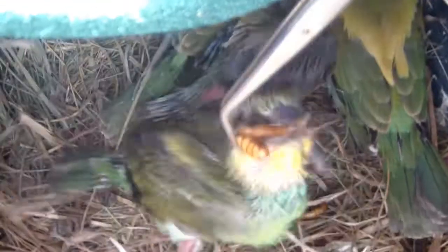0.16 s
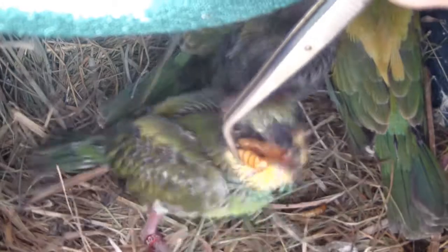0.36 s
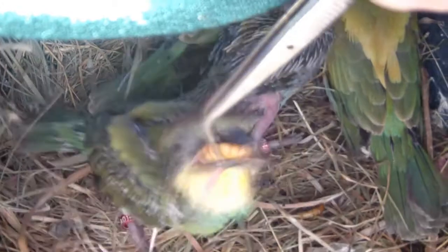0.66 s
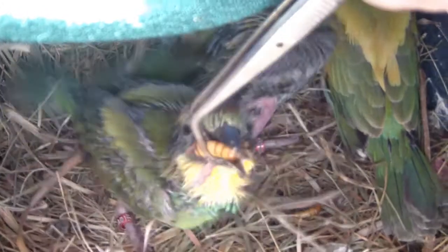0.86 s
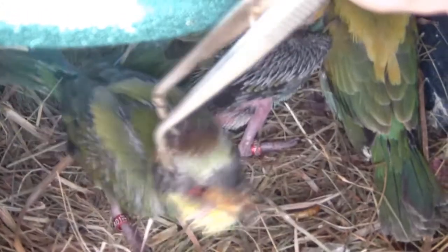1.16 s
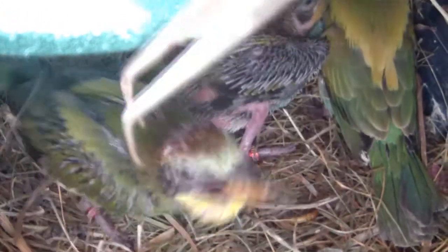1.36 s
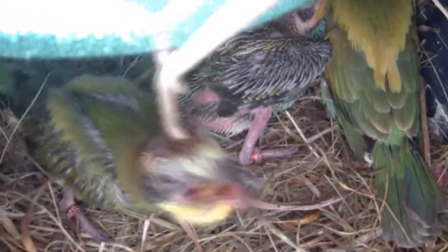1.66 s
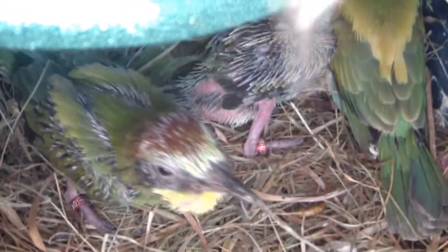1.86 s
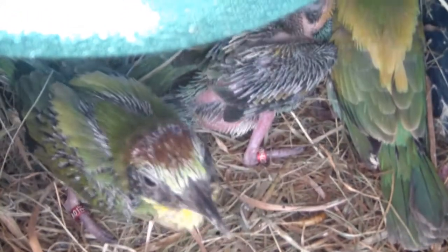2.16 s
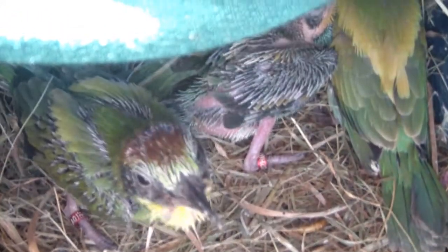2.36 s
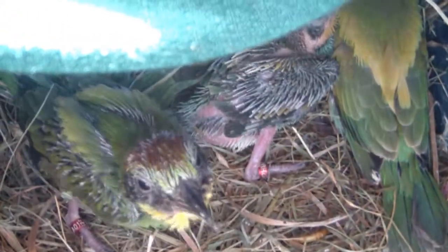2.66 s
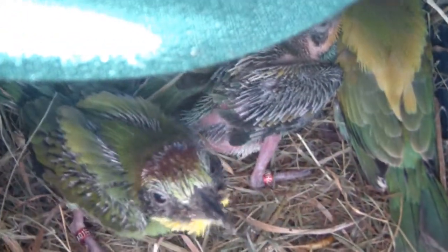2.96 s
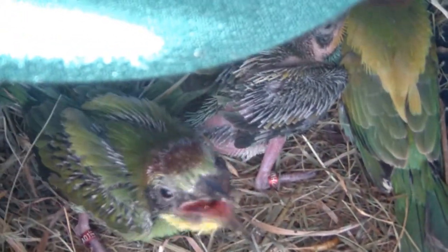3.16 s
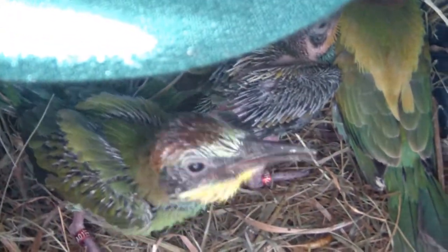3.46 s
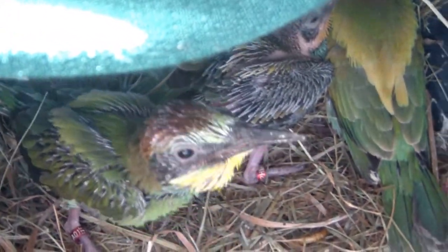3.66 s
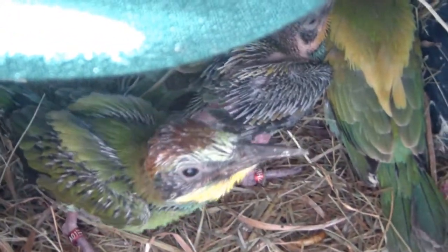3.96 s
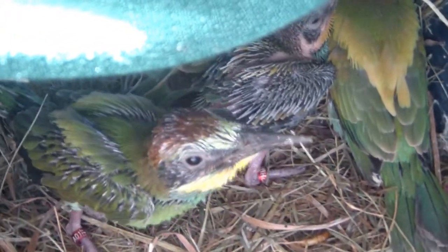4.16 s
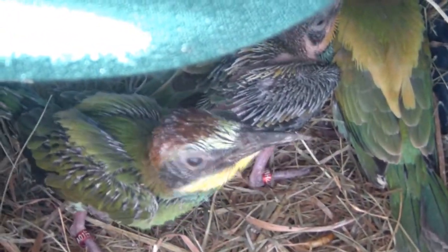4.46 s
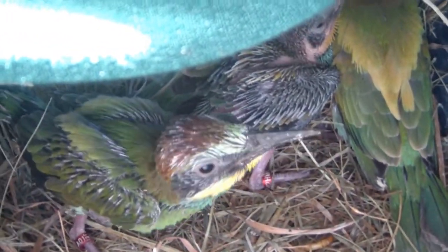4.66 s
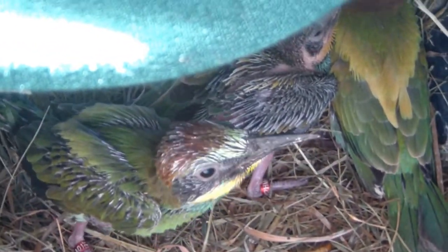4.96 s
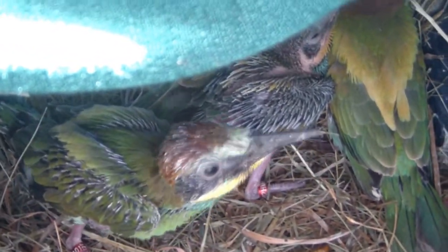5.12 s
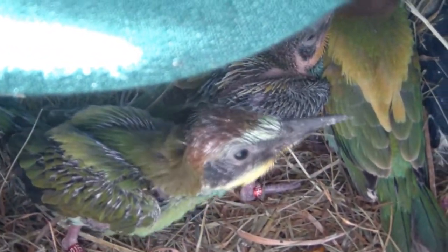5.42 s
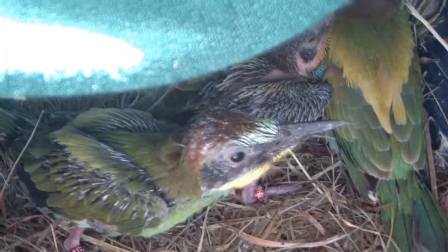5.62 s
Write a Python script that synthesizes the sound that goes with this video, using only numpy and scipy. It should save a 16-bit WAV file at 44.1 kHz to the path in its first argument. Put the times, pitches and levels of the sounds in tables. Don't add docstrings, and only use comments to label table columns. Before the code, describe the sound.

A nestling right at the microphone begs in fast warbling trills amid grass crackle and clacks, then falls quiet while distant young birds peep.

```python
import sys
import numpy as np
from scipy import signal
from scipy.fft import rfft, irfft
from scipy.io import wavfile
from scipy.ndimage import uniform_filter1d

SR = 44100
rng = np.random.default_rng(int(sys.argv[2]) if len(sys.argv) > 2 else 0)


def boost(x):
    u = np.asarray(x, float) / 20
    return 10 ** u


def materialize(psi):
    bounded = np.clip(np.atleast_2d(psi).T, -1, 1)
    quanta = np.round(bounded * 32767).astype(np.int16)
    wavfile.write(sys.argv[1], SR, quanta)


N = 255339
T = np.arange(N) / SR
HZ = np.fft.rfftfreq(N, 1 / SR)

ENTRY_HZ, CHUR_SETTLE_S = 212, 0.0074
LAST_FADE_DB = 15.5


def band(x, lo_hz, hi_hz, order=2):
    return signal.sosfilt(signal.butter(order, [lo_hz, min(hi_hz, .45 * SR)], "band", fs=SR, output="sos"), x)


def unit(x):
    return x / np.sqrt(np.mean(x ** 2))


def noise_band(lo_hz, hi_hz):
    return unit(band(rng.standard_normal(N), lo_hz, hi_hz))


def flutter(hz):
    return unit(signal.sosfilt(signal.butter(2, hz, fs=SR, output="sos"), rng.standard_normal(N)))


def slew(x):
    return uniform_filter1d(x, size=66)


def bumps(times_s, width_s):
    marks = np.zeros(N)
    marks[(times_s * SR).astype(int)] = 1
    bell = np.exp(-(np.arange(-400, 401) / SR / width_s) ** 2)
    return signal.fftconvolve(marks, bell, "same")


def nestling():
    # (time [s], length [s])
    rasps = [(.005, 0.017), (0.111, 0.038), (0.199, 0.055), (0.3, 0.053), (0.546, 0.014), (0.641, 0.014),
             (1.089, 0.024), (2.021, 0.034), (2.131, 0.025), (2.245, 0.03), (2.347, 0.045), (2.531, 0.036),
             (2.619, 0.078), (3.339, 0.12), (3.601, 0.038), (3.697, 0.023), (3.885, 0.092), (4.019, .035),
             (0.431, 0.048), (1.319, 0.0079), (1.43, 0.011), (1.665, 0.011), (1.859, 0.038), (3.644, 0.019)]
    swell_s, runup_s = 0.004, 0.0025
    kick, kick_s, kick_hz = 0.31, 0.0035, 350
    loudest_db = -6

    rows = notes()
    start_s, chur = rows[:, 0], rows[:, 7] == CHUR_SETTLE_S
    k = np.clip(np.searchsorted(start_s, T, "right") - 1, 0, None)
    began_s, from_hz, to_hz, from_db, to_db, octave_db, sharp_hz, settle_s, soft_db, closes = rows[k].T
    since = T - began_s
    along = since / np.diff(start_s, append=N / SR)[k]
    along = along ** (1 + 1.5 * closes)

    jumps = (rows[1:, 1] != rows[:-1, 2]) & (rows[1:, 3] > -80) & (rows[:-1, 3] > -80)
    jump_s = start_s[1:][jumps]
    flick_s = start_s[1:][jumps & ~chur[1:]]
    catch_s = start_s[1:][jumps & ((rows[1:, 6] > 0) | ~chur[1:])]

    after = np.minimum(k + 1, len(rows) - 1)
    runup_hz = chur[after] * rows[after, 6] * np.exp(-np.abs(start_s[after] - T) / runup_s)
    glide = np.where((to_hz < from_hz) & (closes == 0), 1 - (1 - along) ** 1.7, along)
    hz = slew(from_hz + glide * (to_hz - from_hz) + sharp_hz * np.exp(-since / settle_s) + runup_hz)
    hz = hz + 350 * bumps(flick_s, 0.0013)
    phase = 2 * np.pi * np.cumsum(hz * (1 + .006 * flutter(250))) / SR

    tone_db = from_db + along * (to_db - from_db) - soft_db * np.exp(-since / swell_s)
    tone = slew(boost(np.minimum(tone_db, loudest_db)))
    tone = tone * np.clip(1 - 0.68 * bumps(catch_s + 0.0016, 0.0008), 0, 1)
    throbs = np.exp(-since / kick_s) * (1 - np.cos(2 * np.pi * kick_hz * since))
    tone = tone * (1 + kick * (sharp_hz == ENTRY_HZ) * throbs)
    octave = slew(boost(octave_db - closes * along * LAST_FADE_DB + 2.5 * flutter(45)))
    octave = octave * np.clip(1 - bumps(catch_s, .003), 0, 1)

    beat = 2 * np.pi * np.cumsum(380 * (1 + 0.147 * flutter(129.0))) / SR
    rasp = slew(1. * sum((T > s) & (T < s + length_s) for s, length_s in rasps))
    shiver = boost(rasp * 3 * np.tanh(flutter(170)))
    blur = rasp * .6 * flutter(500)
    pure = np.sin(phase + 0.28 * blur) + rasp * 0.19 * np.sin(phase + beat)
    voice = shiver * (tone * boost(0.47 * flutter(81)) * pure + octave * np.sin(2 * phase + blur))
    voice += upper_partials(tone, hz, phase, jump_s)
    return np.sqrt(2) * voice + breath(tone, octave)


def upper_partials(tone, hz, phase, jump_s):
    # (time [s], high partials level [dB], third partial level [dB])
    gape = [(0, -26, -25), (.18, -27, -21.5), (.3, -34, -56), (.6, -35, -64), (0.751, -29, -72),
            (1.0, -33.5, -80), (1.199, -31, -43), (1.449, -28.5, -68), (1.7, -25, -42), (1.839, -29, -40),
            (1.864, -15, -22), (1.903, -52, -54), (2.601, -36, -49), (3.399, -44, -40), (3.55, -24.5, -19),
            (3.64, -31, -18.5), (3.85, -34.5, -31.5), (4.001, -13, -28)]
    partials = [-7, -3, -4, -5, -7]
    s, high_db, third_db = np.transpose(gape)
    third = np.sqrt(tone) * boost(np.interp(T, s, third_db) + 5.4 * flutter(23.0)) * np.sin(3 * phase)
    out = third * np.clip(1 - bumps(jump_s, 0.001), 0, 1)
    strain = slew(tone ** .7 * (tone > boost(-70))) * boost(4)
    high = strain * boost(np.interp(T, s, high_db))
    smear = .06 * flutter(300)
    beak_hz = np.interp(T, [3.87, 3.92], [11300, 8500])
    for order, db in enumerate(partials, start=4):
        level = boost(db - 5 + 7.1 * np.tanh(1.15 * flutter(81)))
        resonance = np.exp(-((order * hz - beak_hz) / 3300) ** 2)
        out += high * level * np.sin(order * (phase + smear)) * resonance
    return out


def breath(tone, octave):
    # (time [s], level [dB])
    puff = [(0, -31), (.3, -35), (.6, -40), (1.0, -40.5), (1.5, -36), (1.86, -35), (2.0, -40), (2.6, -34),
            (3.4, -32), (3.6, -27), (3.85, -35), (4.0, -35)]
    hoarse = (tone * boost(-25.0) + octave * boost(-18.0)) * noise_band(1330, 4420)
    flow = uniform_filter1d(tone ** .45 * (tone > boost(-70)), size=300)
    hiss = flow * boost(np.interp(T, *np.transpose(puff)) + 3 * flutter(60)) * noise_band(8500, 15500)
    return hoarse + hiss


def notes():
    # (time [s], pitch [Hz], level [dB], start above pitch [Hz])
    churs = [(2.018, 1570, -9, -3), (2.065, 1561, -11, 462.5), (2.096, 1766, -7, -7),
             (2.111, 1809, -11, -1.5), (2.127, 1633, -16, 300), (2.137, 1662, -24, 199.5),
             (2.248, 1598, -8, -46), (2.291, 1581, -9, 378), (2.325, 1835, -10, 213),
             (2.346, 1718, -18.5, 260.5), (2.36, 1630, -23, 253.5), (2.532, 1561, -7.5, 0),
             (2.576, 1552, -10, 504), (2.613, 1752, -10.5, 268.5), (2.627, 1844, -20, 207),
             (2.636, 1620, -15, 349.5), (2.651, 1516, -23.5, 287), (3.349, 1582, -15.5, 36),
             (3.387, 1598, -13, 345), (3.427, 1593, -13.5, 440), (3.445, 1480, -23, 215)]
    breaths = [(0.067), (0.474), (1.018), (1.465), (1.91), (2.152), (2.379), (2.673), (3.46), (3.904),
               (4.043)]
    # (time [s], length [s], pitch [Hz], level [dB], octave level [dB])
    early = [(-.02, 0.015, 1900, -36, -20), (.008, .018, 1893, -20, -11), (.035, .033, 1872, -26.5, -7),
             (.126, 0.039, 2048, -17, -11), (.216, 0.018, 1908, -14.5, -14),
             (.241, 0.018, 1934, -15, -11.5), (.319, 0.025, 1923, -12, -25.5),
             (.352, 0.019, 1890, -8.5, -27), (.427, .047, 1847, -17, -23), (.548, 0.037, 2000, -5.5, -20.5),
             (.65, 0.021, 1968, -15, -9.5), (.679, 0.019, 2018, -9.5, -51), (.75, .023, 1850, -8, -59),
             (.781, 0.014, 1970, -8.5, -58), (.86, 0.021, 1788, -9, -52), (.892, 0.018, 1953, -8, -52),
             (.961, 0.023, 1847, -9.5, -38), (.991, 0.025, 1867, -16.5, -31)]
    middle = [(1.094, 0.043, 1977, -7, -53), (1.199, 0.022, 1762, -10.5, -58),
              (1.228, 0.016, 1866, -7, -33), (1.306, 0.019, 1776, -8.5, -64), (1.336, 0.016, 1900, -7, -57),
              (1.409, 0.024, 1800, -9, -64), (1.437, 0.03, 1793, -14.5, -55),
              (1.543, 0.042, 1858, -5.5, -56), (1.652, 0.018, 1730, -9.5, -53),
              (1.684, .019, 1852, -8, -52), (1.755, 0.019, 1806, -8, -25), (1.788, 0.017, 1823, -5.5, -40),
              (1.86, 0.013, 1810, -11.5, -17), (1.889, 0.023, 1652, -20, -30)]
    late = [
        (3.53, 0.034, 1719, -7, -25.5),
        (3.607, 0.014, 1646, -12.5, -17),
        (3.63, 0.014, 1756, -6.5, -14.5),
        (3.696, 0.014, 1633, -13.5, -13),
        (3.719, 0.013, 1788, -5.5, -19),
        (3.783, 0.014, 1627, -11.5, -13.5),
        (3.807, 0.02, 1848, -8, -30),
        (3.874, 0.034, 1565, -15.5, -17.5),
    ]
    # (time [s], pitch [Hz], level [dB], octave level [dB])
    low = [(.03, 1546, -31.5, -34.5), (.19, 1440, -29.5, -25.5), (.4, 1495, -23, -17.5),
           (.62, 1497, -24, -17), (.83, 1514, -21.5, -27), (.935, 1478, -27, -33.5),
           (1.17, 1480, -26.5, -21.5), (1.38, 1473, -25.5, -33), (1.62, 1459, -25.5, -27.5),
           (1.73, 1470, -23, -20.5), (1.83, 1511, -27, -31.5), (3.59, 1267, -25, -29.5),
           (3.76, 1383, -25.5, -26), (3.85, 1341, -21.5, -28)]
    # (time [s], pitch [Hz], level [dB])
    warble = [(3.909, 1687, -18), (3.918, 1855, -18), (3.93, 1645, -14.5), (3.938, 1849, -23),
              (3.957, 1586, -16), (3.985, 1470, -28), (3.994, 1558, -19), (3.999, 1956, -12.5),
              (4.013, 1742, -20), (4.024, 1795, -15), (4.045, 1433, -24)]
    warble_octave_db, chur_octave_db = -24, -56
    rise, first_rise, last_fall = 0.048, 0.061, 0.085
    note_fade_db, chur_fade_db = 4.5, -5.5
    scoop_hz, scoop_s, swell_db = 200, 0.01, 18.5
    entry_settle_s = 0.0025
    sag_from, sag_share, sag_lift, sag_lift_db, hush_db = 0.59, 0.72, 1.04, 10.5, 18
    dip_under_s, dip_up, dip_db, dip_octave_db = .016, 1.05, 10, 11.5
    plain = (0, 1, 0, 0)

    ends = np.array(breaths)
    stops = np.sort(np.r_[ends, np.array(churs)[:, 0]])
    loud = [(*note, ENTRY_HZ, entry_settle_s) for note in list(early) + list(middle) + list(late)]
    for s, hz, db, sharp_hz in churs:
        length_s = stops[stops > s][0] - s
        loud.append((s, length_s, hz, db, chur_octave_db, sharp_hz, CHUR_SETTLE_S))
    loud.sort()
    rows = [(s, 1600, 1600, -80, -80, -80, *plain) for s in np.r_[-1, ends]]
    phrase = np.searchsorted(ends, [note[0] for note in loud])
    for k, (s, length_s, hz, db, octave_db, sharp_hz, settle_s) in enumerate(loud):
        first = k == 0 or phrase[k - 1] < phrase[k]
        last = k == len(loud) - 1 or phrase[k + 1] > phrase[k]
        if last:
            glide, fade_db = -last_fall, LAST_FADE_DB
        elif settle_s == CHUR_SETTLE_S:
            glide, fade_db = rise * first, chur_fade_db
        else:
            glide, fade_db = first_rise if first else rise, note_fade_db
        onset = (-scoop_hz, scoop_s, swell_db) if first else (sharp_hz, settle_s, 0)
        rows.append((s, hz * (1 - glide / 2), hz * (1 + glide / 2), db + fade_db / 2, db - fade_db / 2,
                     octave_db, *onset, last))

        soft_s = s + length_s
        if last or loud[k + 1][0] - soft_s < .004:
            continue
        gap_s, high_hz = loud[k + 1][0] - soft_s, hz
        low_s, *low_columns = np.transpose(low)
        hz, db, octave_db = (np.interp(soft_s + gap_s / 2, low_s, c) for c in low_columns)
        if gap_s < dip_under_s:
            rows.append((soft_s, hz * dip_up, hz * dip_up, db + dip_db, db + dip_db,
                         octave_db + dip_octave_db, *plain))
        else:
            sag_hz = hz + sag_from * (high_hz - hz)
            rows.append((soft_s, sag_hz, hz, db + sag_lift_db, db, octave_db, 0, 1, hush_db, 0))
            rows.append((soft_s + gap_s * sag_share, hz, hz * sag_lift, db, db + sag_lift_db,
                         octave_db, *plain))
    for (s, hz, db), (_, next_hz, next_db) in zip(warble, warble[1:]):
        rows.append((s, hz, next_hz, db, next_db, warble_octave_db, *plain))
    return np.array(sorted(rows), float)


def ticks():
    # (time [s], peak level [dB], brightest [Hz])
    clacks = [(.13, -25, 7000), (0.486, -35, 2590), (0.534, -4, 600), (.551, -18, 4010), (0.653, -20, 7000),
              (1.094, -13, 4000), (1.538, -5, 1480), (1.553, -15.5, 8990), (1.802, -19, 5994),
              (1.861, -8, 6000), (2.015, -8.5, 1504), (2.378, -39, 1528), (2.706, -15, 9950),
              (3.301, -22, 10120), (3.604, -27, 810), (3.695, -21, 701.5), (4.575, -23, 8990),
              (4.632, -25, 10000), (4.832, -16.5, 970), (5.083, -42, 9000), (5.125, -35, 9500),
              (.486, -26, 1200), (1.951, -20, 700)]
    decay_s = .0025
    out = np.zeros(N)
    for s, db, hz in clacks:
        at = int(s * SR)
        burst = rng.standard_normal(2048) * np.exp(-T[:2048] / decay_s)
        out[at:at + 2048] += boost(db) * band(burst, hz / 2, hz * 2, order=1)
    return out


def tub():
    # (time [s], peak level [dB], pitch [Hz])
    knocks = [(0.123, -26.5, 100), (0.187, -24, 130), (0.214, -24.5, 200), (0.305, -14.5, 148.6),
              (0.328, -22.5, 130), (0.457, -26, 107), (0.519, -27, 220), (.645, -16, 156), (.7, -30, 170),
              (0.763, -21.5, 225), (.833, -29, 122.2), (0.947, -22.5, 189), (1.079, -16, 229.5),
              (1.102, -27.5, 117), (1.439, -27.5, 110.2), (1.502, -16.5, 172), (1.54, -26, 200),
              (1.685, -25.5, 98.1), (1.899, -29, 150), (1.951, -19.5, 242.9), (2.18, -32, 148),
              (2.231, -21, 248), (2.431, -33, 206), (2.765, -13.5, 263), (2.824, -11.5, 195),
              (2.96, -40, 181), (3.373, -20.5, 157.2), (3.791, -37, 240), (3.956, -11.5, 162.8),
              (4.125, -27.5, 302.4), (4.162, -21.5, 153.5), (5.481, -24.5, 200), (5.686, -23, 150)]
    # (time [s], level [dB])
    shuffle = [(0, -49.5), (.3, -36), (.6, -40.5), (1.7, -48.5), (1.95, -38.5), (2.4, -47), (2.69, -38),
               (2.75, -22), (2.98, -28.5), (3.2, -36), (3.7, -39.5), (4.0, -36), (4.4, -41.5), (4.9, -44),
               (5.6, -37.5), (5.72, -31)]
    rumble = noise_band(122.0, 249.4) + boost(-5.0) * noise_band(41, 56) + boost(-6.5) * noise_band(444, 1300)
    out = boost(np.interp(T, *np.transpose(shuffle)) + 4.75 * flutter(6.1)) * rumble
    for s, db, hz in knocks:
        since = np.clip(T - s, 0, None)
        envelope = 2 * (1 - np.exp(-since / 0.0016)) * np.exp(-since / 0.0065)
        out += boost(db) * envelope * (np.sin(2 * np.pi * hz * since) + 0.26 * np.sin(4.6 * np.pi * hz * since))
    return band(out, 49, 4800)


def grass():
    # (time [s], length [s], level
    # [dB], brightest [Hz])
    rustles = [(0.085, 0.34, -32.5, 5556), (0.485, 0.05, -25, 723.6), (0.492, 0.056, -23.5, 1840),
               (0.96, 0.072, -34.5, 670), (1.038, 0.094, -27, 2008), (1.483, 0.063, -29, 641),
               (1.491, 0.042, -25.5, 2013), (1.921, 0.027, -25.5, 669.6), (2.24, 0.0044, -9.5, 1430),
               (2.522, 0.0087, -17, 869), (2.704, 0.06, -21, 1470), (2.716, 0.27, -29, 860),
               (3.296, 0.15, -24.5, 8231), (3.285, 0.091, -24.5, 2573), (1.54, 0.018, -24, 3611),
               (5.33, 0.033, -35, 14810), (0.0853, 0.032, -31.5, 810), (1.899, 0.11, -30, 2800),
               (5, 0.2, -41, 8316), (5.316, 0.066, -27.5, 1610), (5.663, 0.057, -28, 1222)]
    # (time [s], length [s], level [dB], brightest [Hz])
    brushes = [(.29, .015, -37, 12000), (.42, .02, -38, 11000), (2.02, .2, -44, 12000),
               (2.24, .11, -41, 12000), (2.39, .14, -46, 6000), (2.54, .035, -38, 9000),
               (2.708, .16, -38, 11000), (3.56, .4, -41, 17000), (4.7, .04, -47, 11000),
               (4.83, .04, -49, 11000), (5.08, .07, -49, 11000), (5.662, .018, -42, 9000)]
    sizes = boost(np.minimum(4 * rng.exponential(size=N), 12))
    snaps = rng.standard_normal(N) * (0.64 + (rng.random(N) < .03) * sizes)
    out = np.zeros(N)
    for s, length_s, db, hz in list(rustles) + list(brushes):
        since = np.clip(T - s, 0, None)
        envelope = (1 - np.exp(-since / 0.0028)) * np.exp(-(since / length_s) ** 2)
        out += boost(db) * envelope * unit(band(snaps, hz / 1.75, hz * 1.63))
    return out


def others(calls, rough):
    out, wobble, shake = np.zeros(N), flutter(597), np.tanh(flutter(126))
    for s, length_s, start_hz, end_hz, db in calls:
        at = slice(int(s * SR), int((s + length_s) * SR))
        along = (T[at] - s) / length_s
        hz = (end_hz + (start_hz - end_hz) * (1 - along) ** 1.6) * (1 + rough * wobble[at])
        phase = 2 * np.pi * np.cumsum(hz) / SR
        swell = np.sin(np.pi * np.clip(along, 0, 1) ** .7) ** .7
        tone = np.sqrt(2) * (np.sin(phase) + boost(-27) * np.sin(2 * phase))
        out[at] += boost(db + 3.2 * shake[at]) * swell * tone
    return out


def whistles():
    # (time [s], length [s], start pitch [Hz], level [dB])
    swoops = [
        (.095, 0.083, 8490, -37.5),
        (2.08, 0.048, 8740, -37),
        (2.855, 0.079, 10330, -42.5),
        (2.868, 0.099, 6667, -37.5),
        (3.033, 0.15, 9350, -45.5),
        (3.059, 0.11, 2196, -45.5),
        (3.173, 0.038, 8710, -29.5),
        (3.187, 0.021, 8670, -35),
        (4.218, 0.051, 8755, -29),
        (5.731, 0.063, 6020, -41.5),
    ]
    sighs = [
        (2.751, 0.23, 2330, -44),
        (3.061, 0.16, 5790, -39.5),
        (4.045, 0.021, 1170, -41),
        (4.7, 0.078, 5880, -42),
        (4.704, 0.23, 7020, -54),
        (5.089, 0.051, 1818, -48.5),
        (5.16, 0.014, 8770, -47.5),
        (5.728, 0.043, 7600, -46.5),
    ]
    climbs = [
        (.412, .14, 3508, -41),
        (1.62, 0.13, 4570, -46),
        (1.75, 0.027, 4960, -37),
        (1.93, 0.031, 4440, -33),
        (2.218, 0.03, 3880, -34),
        (3.325, .04, 4295, -53),
        (4.36, 0.0297, 4090, -34),
        (5.556, 0.027, 2740, -45),
        (5.69, 0.083, 3370, -48),
    ]
    peeps = [(1.45, 0.072, 4850, -41), (1.515, 0.02, 5130, -30), (.31, 0.04, 4500, -39.5),
             (2.23, 0.028, 3810, -35), (1.98, 0.026, 5730, -31.5), (3.293, 0.092, 5760, -28),
             (3.41, 0.078, 3960, -39), (3.85, 0.079, 4453, -42), (3.925, 0.051, 4680, -34),
             (3.99, 0.024, 5640, -32.5), (4.085, 0.13, 3190, -51), (4.38, 0.15, 4944, -44),
             (4.65, 0.039, 3265, -45.5), (2.44, 0.083, 2330, -46), (2.504, 0.12, 3806, -41.5),
             (2.662, 0.049, 3826, -40.5), (4.199, 0.021, 5900, -33.5), (4.267, 0.043, 5330, -32.5),
             (5.146, 0.051, 2693, -49), (5.149, 0.052, 5380, -48.5), (5.45, 0.061, 555.5, -51.5),
             (5.58, 0.14, 3123, -44)]
    kinds = [(swoops, .73), (sighs, .87), (climbs, 1.19), (peeps, 1)]
    calls = [(s, length_s, hz, hz * to, db) for kind, to in kinds for s, length_s, hz, db in kind]
    return others(calls, .03)


def screeches():
    # (time [s], length [s], start pitch [Hz], end pitch [Hz], level [dB])
    calls = [(.083, 0.023, 4070, 3860, -38.5), (1.045, .05, 7970, 7040, -39.5),
             (1.985, 0.11, 5640, 5100, -48.5), (2.86, 0.11, 3050, 2610, -50),
             (4.41, 0.093, 6604, 5955, -42), (1.905, 0.15, 3700, 4115, -45), (3.3, 0.11, 5046, 4403, -32.5),
             (3.92, 0.19, 4640, 3990, -37.5), (4.2, 0.21, 3518, 1894, -36.5), (4.28, 0.26, 1581, 2574, -46),
             (4.24, 0.2, 4460, 4220, -40), (4.58, 0.12, 2412, 3290, -50.5), (5.08, 0.059, 2427, 2256, -48)]
    return others(calls, .16)


def room(x, t60_s, early_s, spread):
    t = T[:SR]
    mid, side = rng.standard_normal((2, SR)) * boost(-60 * t / t60_s) * (1 - np.exp(-t / early_s))
    side = band(side, 6000, 20000, order=1)
    tails = [unit(mid + sign * spread * side) / np.sqrt(SR) for sign in (1, -1)]
    return np.array([signal.fftconvolve(x, tail)[:N] for tail in tails])


def air():
    # (frequency [Hz], density [dB per Hz])
    spectrum = [(25, -9), (50, 7), (90, -1.5), (400, -15.5), (600, -10), (2500, -7.5), (6500, -21),
                (16000, -21)]
    hz, db = np.transpose(spectrum)
    colour = boost(np.interp(np.log(HZ + 1), np.log(hz), db))
    mid, side = irfft(rfft(rng.standard_normal((2, N))) * colour, n=N)
    stereo = np.array([mid + 0.86 * side, mid - 0.48 * side])
    return boost(-46 + 0.5 * flutter(38.0)) * stereo / np.std(band(mid, 300, 22000))


def duck(loud):
    from_db, slope, release_hz = -10, 0.9, 5.1
    pole = np.exp(-2 * np.pi * release_hz / SR)
    held = signal.lfilter([1 - pole], [1, -pole], np.abs(loud))
    return (1 + held / boost(from_db)) ** -slope


def scene():
    voice = nestling()
    near = voice + grass() + tub() + ticks()
    clear, hoarse = whistles(), screeches()
    echo = room(clear, .4, 0.0024, 0.75)
    patchy = boost(2.5 * flutter(14.0))
    echo = echo + boost(-2.0) * room(hoarse, 0.88, 0.0022, 0.62) * patchy
    distance = boost(12.5) * (clear + hoarse) + boost(15.0) * echo + air()

    walls = boost(-5) * room(band(near, 4680, 27000), 0.006, 0.0008, 1.6)
    walls = walls + boost(-7) * room(band(near, 9500, 27000), .005, .0003, 4)
    offset = boost(-15.0) * np.array([[1], [-1]]) * band(near, 89, 2600)
    return near + offset + walls + boost(-14.0) * room(near, 0.3, 0.00006, 0.93) + duck(voice) * distance


def low_pass(x):
    return signal.sosfilt(signal.butter(12, 15950, fs=SR, output="sos"), x)


def record(dry):
    # (frequency [Hz], left minus right [dB], colour [dB])
    ports = [(40, 4, 0), (200, -1.2, 0), (1000, -2.7, 0), (1230, -2.7, -9), (1450, -2.3, 0),
             (4000, -1.3, 0), (12000, -4.3, 0), (15800, -4.3, -1)]
    hz, *columns_db = np.transpose(ports)
    pan_db, colour_db = (np.interp(np.log(HZ + 1), np.log(hz), c) for c in columns_db)
    response = boost(colour_db + np.array([pan_db, -pan_db]) / 2) * (HZ < 16050)
    wet = irfft(rfft(dry) * response, n=N)
    return low_pass(np.tanh(0.53 * wet) / 0.67)


dry = scene()
out = record(dry)
materialize(out)
```